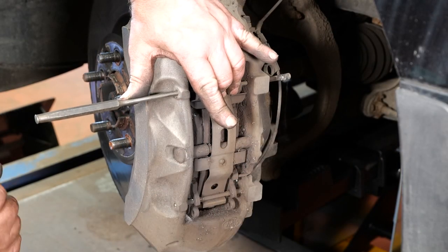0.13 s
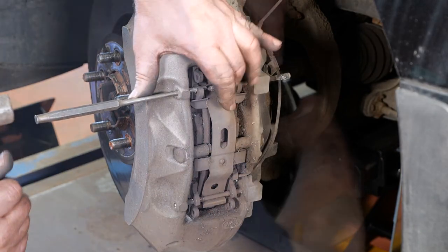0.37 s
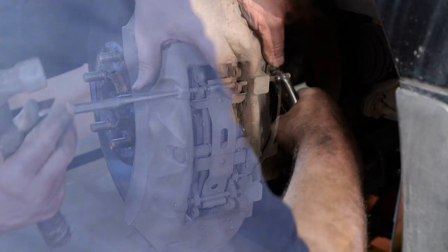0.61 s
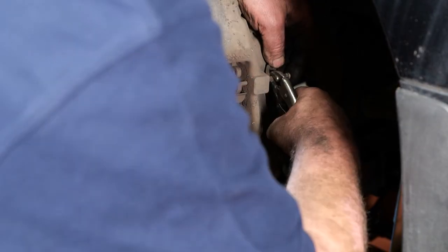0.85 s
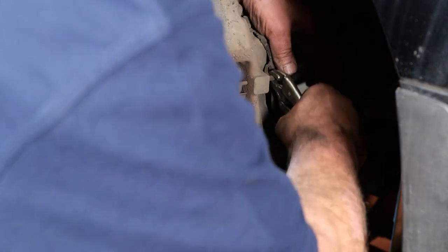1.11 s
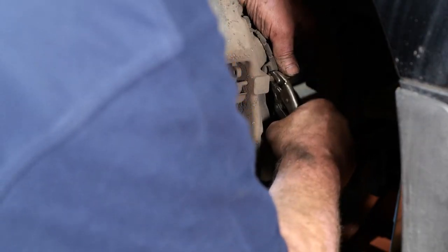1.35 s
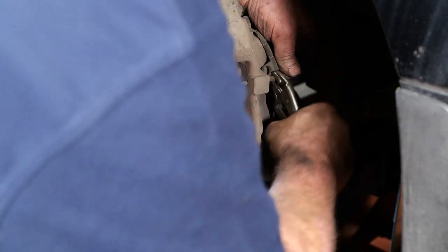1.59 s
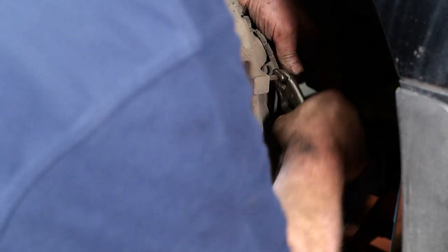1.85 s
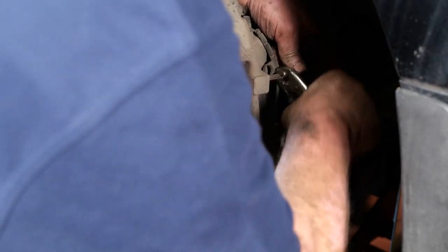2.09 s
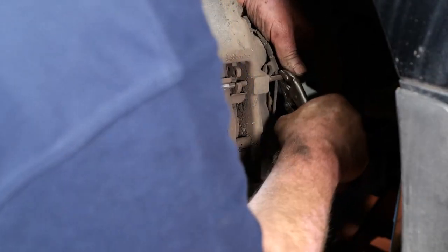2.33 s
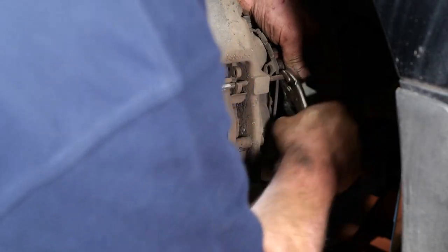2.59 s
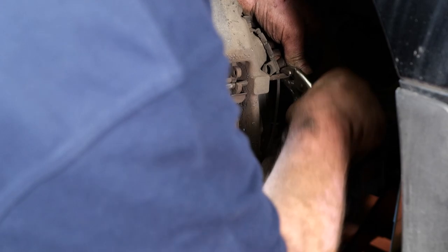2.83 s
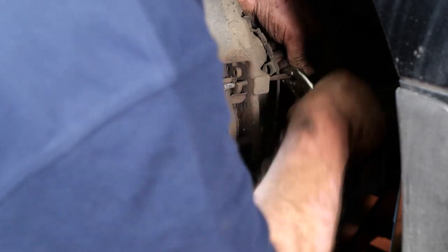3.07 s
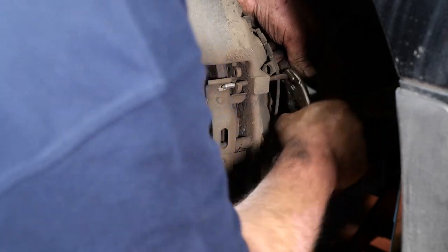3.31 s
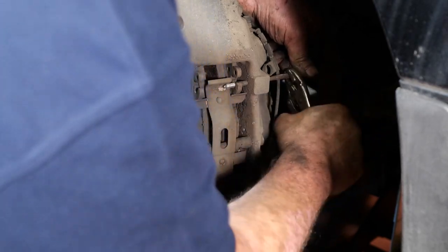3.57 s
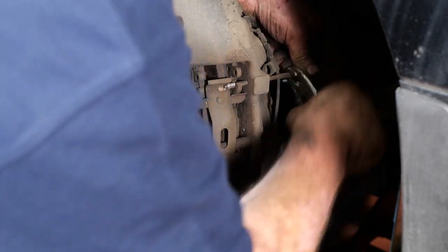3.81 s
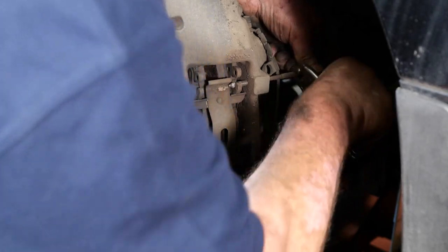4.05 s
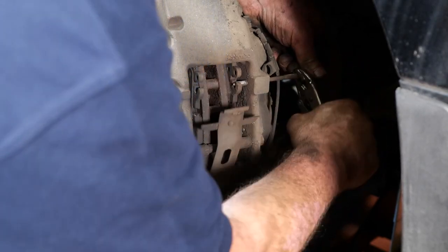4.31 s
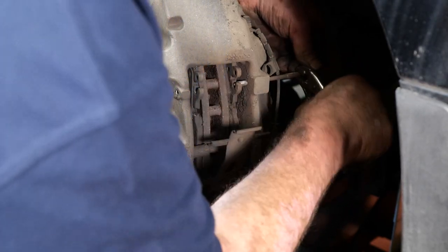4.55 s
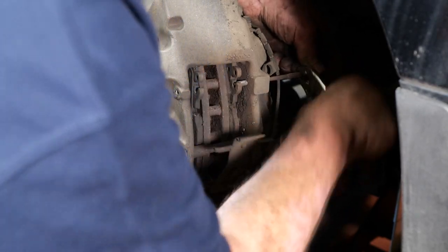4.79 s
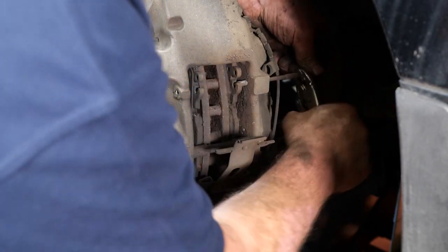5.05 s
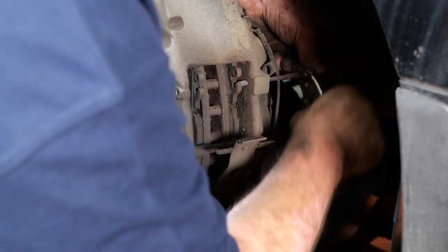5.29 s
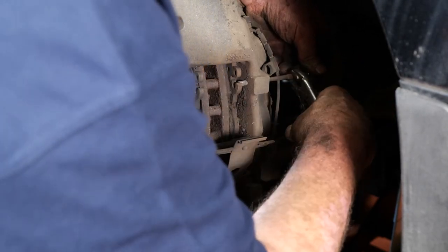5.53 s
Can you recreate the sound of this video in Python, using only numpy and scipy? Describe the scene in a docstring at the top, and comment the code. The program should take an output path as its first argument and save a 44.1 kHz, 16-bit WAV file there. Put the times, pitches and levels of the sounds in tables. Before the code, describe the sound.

Close up in a quiet workshop, the tail of one hammer blow leads into two loud, bright strikes on a steel punch, the heavy brake caliper ringing. The ring and echo are chopped off suddenly. Very quiet pliers work follows, with small ticks, dry rubs and faint squeaks, until a flat metal spring pops out with a sharp clack and a short rattle. Faint ticks and rubs continue over low rumble and soft hiss.

```python
"""Quiet workshop, close to a brake caliper: a hammer taps a steel punch, then its ring and echo break off abruptly.
Pliers twist the pin with ticks, rubs and squeaks until the pad spring jumps out and rattles down.
Impacts are noisy cracks plus decaying modes of the struck object; rubs and squeaks are filtered noise.
The room answers every sound; a low rumble, a far machine's hum and microphone hiss lie beneath.
"""
import sys
import numpy as np
from scipy import signal
from scipy.fft import rfft, irfft
from scipy.io import wavfile
from scipy.ndimage import uniform_filter1d

SR = 44100
rng = np.random.default_rng(int(sys.argv[2]) if len(sys.argv) > 2 else 0)


def amplitude_ratio(level_db):
    """Convert a level in decibels to the matching linear amplitude (field) ratio."""
    exponent = np.asarray(level_db, float) / 20
    return 10 ** exponent


def output_pcm(signal):
    """Save a mono or channel-first signal as 16-bit PCM at the path in sys.argv[1].

    Samples are clipped to [-1, 1] before scaling.
    """
    pcm = np.clip(np.atleast_2d(signal).T, -1, 1) * 32767
    wavfile.write(sys.argv[1], SR, np.round(pcm).astype(np.int16))


N = 249606

# Impacts of hammer, spring and pliers: start_s, level_db (before band colour and tilt),
# tilt_db_per_octave (hardness), crack_t60_s
BLOWS = [(-.097, -26.5, -0.29, 0.075), (0.1246, -21, 0.092, 0.049), (0.3448, -20, 0.57, 0.075)]
SPRING_HITS = [(4.1225, -47.5, -3, 0.074), (4.126, -46, -1, 0.094), (4.136, -53, -3.5, 0.091),
               (4.145, -55, 0, 0.026), (4.2745, -46.5, -1.5, 0.086), (4.2835, -18, 4, 0.037),
               (4.297, -28.5, 1.4, 0.089), (4.3025, -32, 3, 0.052), (4.343, -49, 1.7, 0.06),
               (4.409, -42, -0.4, 0.052), (4.4125, -43.5, -1, 0.087), (4.419, -61, -6, 0.074)]
TICKS = [(.7194, -71, 4, .015), (1.3513, -62.5, -0.5, 0.011), (1.3634, -65, .1, .02),
         (1.3894, -58.5, 0.5, 0.013), (1.4044, -60.5, 3.5, 0.018), (1.4202, -55.5, -1.5, 0.021),
         (1.6092, -58, -1.8, 0.041), (1.7264, -68, -2.1, 0.018), (1.7384, -48.5, 4, 0.025),
         (1.8924, -64, 6.2, 0.058), (1.9016, -51, -3, 0.025), (2.155, -64.5, -8, 0.029),
         (2.2955, -41.5, -3.5, 0.033), (2.2995, -62.5, -9, 0.017), (2.4744, -67, -1, 0.065),
         (3.6644, -66.5, -2, .026), (4.6814, -74, 1.5, 0.042), (4.7974, -58, -0.5, 0.017),
         (4.8074, -74, 8, .013), (4.8594, -68, -9, 0.05), (5.194, -70, -9, 0.035),
         (5.2974, -61.5, -0.5, 0.014), (5.4744, -66, 6, 0.037), (5.4919, -53, 4.5, .035),
         (5.6431, -58.5, 4.5, 0.044)]
# Edges of the four crack bands of each kind: edge_hz
BLOW_EDGES_HZ = (220, 1000, 3000, 8500, 15000)
SPRING_EDGES_HZ = (220, 1100, 3000, 8500, 15000)
TICK_EDGES_HZ = (600, 2400, 4900, 9000, 15000)
# Tone colour of each kind, one offset per band: level_db
BLOW_COLOUR_DB = (-6, -5, -1.5, -4.5)
SPRING_COLOUR_DB = (-6, 0.5, -2, -5.5)
TICK_COLOUR_DB = (-8, -1, -1, -4)
# Ringing modes of the caliper, the plate the spring strikes and the pliers: pitch_hz, level_db, t60_s
CALIPER_MODES = [(60, -3, .45), (105, -7, .35), (150, -7, .3), (210, -8, .25), (255, -5, .3), (307, 1, .43),
                 (345, -6, .4), (391, 0, .5), (430, -3, .3), (517, -3, .55), (580, -7, .3), (656, -1, .13),
                 (760, -5, .12), (851, -15, .6), (1093, 1, .38), (1217, -12, .5), (1560, -6, .08),
                 (1730, -3, .2), (1850, -4, .1), (2240, -5, .16), (2805, -10, .2), (3898, -7, .13),
                 (4247, -14, .2), (4592, -12, .14), (4990, -7, .11), (5572, -9, .15), (6610, -11, .2),
                 (7100, -7, .13), (7784, -13, .15), (8258, -11, .12), (11130, -17, .15), (11900, -12, .08)]
PLATE_MODES = [(45, -5.5, 0.41), (130, -17.5, 0.19), (267.6, -6.5, .12), (523, -18, .12), (731, 0, 0.2),
               (1280, -3, 0.09), (1660, -4.5, 0.18), (1804, -5, 0.22), (1906, -19, .15), (2244, -8, 0.13),
               (2960, -24, .11), (3860, -22.5, .15), (4096, -8, 0.19), (4235, -18.5, 0.37),
               (4500, -7, 0.14), (5200, -6.5, 0.063), (6200, -5, 0.086), (6600, -6.5, 0.078),
               (6960, -6, .1), (7150, -4.5, 0.11), (7820, -5, .12), (8340, -9.5, .15), (11900, -14.5, 0.11),
               (13400, -12, .1)]
PLIERS_MODES = [(1144, 8, 0.086), (1496, 11, 0.096), (1730, 7, 0.15), (2280, 0.5, 0.11), (2860, -7, 0.11),
                (3690, -5.5, 0.051), (4160, -20, 0.048), (5690, -0.5, 0.03), (7270, 1.5, 0.023),
                (10300, -9, 0.046), (11350, -5, 0.02)]
# The pin turning in its bore, a hand brushing past: middle_s, half_length_s,
# level_db (before band colour, tilt and swell), tilt_db_per_octave
RUBS = [(1.205, 0.11, -79.5, 10.5), (1.67, 0.062, -79, 0), (1.84, .04, -78, 1), (2.0, .026, -71.5, -1),
        (2.135, 0.042, -77.5, 2.5), (2.288, 0.023, -61.5, 0.5), (2.391, 0.024, -76.5, 3.5),
        (2.6, 0.06, -78, 1.5), (2.71, 0.04, -76.5, -0.5), (2.856, 0.062, -73, -0.2),
        (3.018, 0.037, -71, -3), (3.174, .033, -70, -0.5), (3.338, 0.033, -70.5, -2),
        (3.47, 0.034, -72.5, -0.5), (3.645, 0.039, -73.5, 3.3), (3.778, 0.022, -74, 1.2),
        (3.966, 0.051, -75, 0.8), (4.759, .035, -66, -2.3), (4.868, 0.029, -75.5, -3),
        (5.194, .025, -83, -3.5), (5.26, 0.026, -79, -3.7), (5.599, .025, -84.5, 4.5)]
# Edges of the three rub bands: edge_hz
RUB_EDGES_HZ = (1000, 3300, 8500, 14000)
# Tone colour of the rubs, one offset per band: level_db
RUB_COLOUR_DB = (-1.5, -3, -11)
# Resonances of the rubbed pin: pitch_hz, level_db
BORE_MODES = [(1200, 0), (2400, -6), (4900, -8), (6000, -4.5), (7500, -10.5), (11500, -7)]
# Brief squeaks of the pin slipping: start_s, pitch_hz, level_db (rms before the swell), half_length_s
SQUEAKS = [(1.925, 1117, -66, .045), (2.151, 1800, -70, 0.029), (2.225, 1760, -68.5, 0.049),
           (3.51, 3040, -66, 0.016), (4.861, 800, -61.5, 0.0316), (5.189, 1268, -62.5, .025),
           (5.25, 2290, -67, 0.025)]
# The workshop's answer to a click: band_centre_hz, level_db (energy), t60_s
ROOM_BANDS = [(162, -18.5, 0.23), (267, -24, 0.24), (560, -35, 0.45), (1210, -31.5, 0.95),
              (1852, -28.5, 0.53), (3370, -27.5, 0.57), (5100, -24.5, 0.34), (7000, -28.5, 0.74),
              (10500, -27.5, 0.47), (13444, -31.5, 0.38)]
# Spectrum of the building's rumble: pitch_hz, level_db_per_hz (relative)
AIR_SPECTRUM = [(13, -23), (24, 5.5), (34, -1.5), (97, -6.5), (243, -13.5), (429, -11), (548, -20.5),
                (627, -20.5), (867, -23.5), (940, -25), (1230, -22), (2000, -24.5), (2770, -33.5),
                (5740, -43), (12200, -53), (14000, -54.5)]
# Tones of the far machine: pitch_hz, level_db (rms)
HUM_TONES = [(274.5, -87.5), (339.1, -79.5), (366.1, -83), (409.1, -81.5), (430.7, -77.5), (500.6, -86),
             (613.7, -85.5)]

CUT_S = .551  # the hammer's sound is gone from here on
LEAD = SR // 5  # samples of sound before the start
AIR_DB, AIR_SIDE_DB = -65.5, -22  # rms; stereo side against the middle
HUM_WIDTH_HZ = 7.3
SIDE_DB, ROOM_SIDE_DB = -24.5, -21.5  # side level of the early scatter (before its treble tilt), of the echo
DAMPED_WIDTH, BETWEEN_MODES_DB = 0.028, -7  # hump half-width as a share of the pitch; floor between humps
RISE_S, CRACK_GRAIN_DB = .0002, 2.2  # time constant of the crack's onset; unevenness of its grains
PIVOT_HZ = 4000  # tilt turns about this pitch
FAINT_DB, FAINT_SPREAD_DB, FAINT_TILT_DB, FAINT_T60_S = -72.5, 5, 0, .025  # stray faint ticks
SQUEAK_WIDTH = 0.091  # share of the pitch, to either side
THUMP_DB, THUMP_S = -12, 0.0016  # peak against the blow's level; contact time
OVERLOAD, ROLL_OFF_HZ = 0.44, 12800  # amplitude limit of the microphones; start of their treble loss
HISS_DB, HISS_LOW_HZ, HISS_TOP_HZ = -81.5, 1505, 12900
TOP_HZ = 16300


def band(x, low_hz, high_hz):
    """Steep band-pass."""
    sos = signal.butter(3, [low_hz, min(high_hz, .45 * SR)], "band", fs=SR, output="sos")
    return signal.sosfilt(sos, x)


def below(x, top_hz):
    """Brick-wall low-pass."""
    return signal.sosfilt(signal.ellip(8, .2, 60, top_hz, fs=SR, output="sos"), x)


def unit(x):
    """Scale to rms 1."""
    return x / np.sqrt(np.mean(x ** 2))


def fade(t60, size):
    """Exponential decay, 60 dB in t60 (3 ms at the least)."""
    return np.exp(-np.log(1000) * np.arange(size) / SR / max(t60, .003))


def add(track, s, sound):
    """Mix a sound in at time s."""
    i = int(s * SR) + LEAD
    track[i:i + len(sound)] += sound[:len(track) - i]


def split(x, edges_hz):
    """Neighbouring bands, each at rms 1."""
    return [unit(band(x, low, high)) for low, high in zip(edges_hz, edges_hz[1:])]


def band_centres(edges_hz):
    """Geometric middle of each band, in Hz."""
    return np.sqrt(np.multiply(edges_hz[1:], edges_hz[:-1]))


def colour(edges_hz, colour_db, db, tilt_db):
    """Level of each band: harder contacts tilt towards the treble, softer ones towards the bass."""
    octaves = np.log2(band_centres(edges_hz) / PIVOT_HZ)
    return db + np.array(colour_db) + tilt_db * octaves


def grit(grain_db, size):
    """Noise of tiny contacts, a few much bigger than the rest."""
    return rng.standard_normal(size) * amplitude_ratio(grain_db * rng.exponential(size=size))


def humps(x, hz, mode_db, width):
    """While parts touch, the modes are damped into broad humps that colour the noise of the contact."""
    f = np.fft.rfftfreq(len(x), 1 / SR)
    resonances = amplitude_ratio(mode_db) / (1 + ((f - hz) / (width * hz)) ** 2)
    shape = amplitude_ratio(BETWEEN_MODES_DB) + np.sum(resonances, axis=0)
    return irfft(shape * rfft(x), len(x))


def rumble():
    """Broadband noise of the building, shaped by its spectrum."""
    f = np.maximum(np.fft.rfftfreq(N, 1 / SR), 1)
    hz, db = np.transpose(AIR_SPECTRUM)
    shape = amplitude_ratio(np.interp(np.log(f), np.log(hz), db))
    return amplitude_ratio(AIR_DB) * unit(irfft(shape * rfft(rng.standard_normal(N)), N))


def machine_hum():
    """Far machine: narrow noise bands, heard as wavering tones."""
    hum = np.zeros(N)
    for hz, db in HUM_TONES:
        tone = band(rng.standard_normal(N), hz - HUM_WIDTH_HZ / 2, hz + HUM_WIDTH_HZ / 2)
        hum += amplitude_ratio(db) * unit(tone)
    return hum


def workshop():
    """Rumble and far hum, nearly alike in both ears; a weak unrelated rumble widens them."""
    mid = below(rumble() + machine_hum(), HISS_TOP_HZ)
    return mid + amplitude_ratio(AIR_SIDE_DB) * rumble() * np.array([[1], [-1]])


def room(dry):
    """Diffuse echo, each band dying at its own rate; the side gets a weak unrelated echo and early scatter."""
    echo = np.zeros((2, SR))
    for hz, db, t60 in ROOM_BANDS:
        tail = band(rng.standard_normal((2, SR)), hz / 1.4, hz * 1.3) * fade(t60, size=SR)
        echo += amplitude_ratio(db) * unit(tail) / np.sqrt(SR)
    mid, side = signal.fftconvolve(dry[None], echo, axes=1)[:, :len(dry)]
    scatter = unit(rng.standard_normal(1600) * fade(.03, size=1600)) / 40  # energy 1
    # the early scatter at the sides is tilted towards the treble
    scatter = signal.lfilter([1, -.45], 1, scatter)
    early = signal.fftconvolve(dry, scatter)[:len(dry)]
    side = amplitude_ratio(ROOM_SIDE_DB) * side + amplitude_ratio(SIDE_DB) * early
    return np.array([dry + mid + side, dry + mid - side])[:, LEAD:]


def rubs():
    """Dense grit through the pin's resonances, swelling and dying with each turn of the wrist."""
    track = np.zeros(N + LEAD)
    hz, mode_db = np.transpose(BORE_MODES)[:, :, None]
    layers = split(humps(grit(grain_db=2.5, size=N), hz, mode_db, width=0.094), RUB_EDGES_HZ)
    for middle_s, half_s, db, tilt_db in RUBS:
        levels_db = colour(RUB_EDGES_HZ, RUB_COLOUR_DB, db, tilt_db)
        start, size = int((middle_s - half_s) * SR), int(2 * half_s * SR)
        sound = sum(amplitude_ratio(level) * layer[start:start + size] for level, layer in zip(levels_db, layers))
        add(track, middle_s - half_s, sound * np.hanning(size) ** 0.5)
    return track


def squeaks():
    """Slip noise caught by one narrow resonance, quick to start, slow to die."""
    track = np.zeros(N + LEAD)
    for s, hz, db, half_s in SQUEAKS:
        u = np.arange(int(2 * half_s * SR)) / (half_s * SR)  # runs from 0 to 2
        noise = band(rng.standard_normal(SR // 5), hz * (1 - SQUEAK_WIDTH), hz * (1 + SQUEAK_WIDTH))
        swell = np.sqrt(u) * np.exp(-3 * u) * 3
        add(track, s, amplitude_ratio(db) * unit(noise[-len(u):]) * swell)  # the end of the noise, filter settled
    return track


def strike(events, edges_hz, colour_db, modes, ring_db, detune, rattle_db, bloom_s, size):
    """Each impact is a rattling crack in four bands; its colour sets how hard each mode of the object rings."""
    track = np.zeros(N + LEAD)
    hz, mode_db, t60 = np.transpose(modes)[:, :, None]
    t = np.arange(size) / SR
    log_centres = np.log(band_centres(edges_hz))
    dying = np.array([fade(d, size) for d in t60[:, 0]])
    # the blow takes a moment to spread through the whole object
    bloom = 1 - np.exp(-t / max(bloom_s, 1e-4))
    for s, db, tilt_db, crack_t60 in events:
        levels_db = colour(edges_hz, colour_db, db, tilt_db)
        contact = (1 - np.exp(-t / RISE_S)) * fade(crack_t60, size)
        layers = split(humps(grit(CRACK_GRAIN_DB, size), hz, mode_db, DAMPED_WIDTH), edges_hz)
        crack = sum(amplitude_ratio(level) * layer for level, layer in zip(levels_db, layers))
        strength, shift, phase = rng.standard_normal((3, len(hz), 1))
        # loose neighbours touch and let go, so each mode swells and chokes as it dies
        steps = np.repeat(rng.standard_normal((len(hz), size // 500)), 500, axis=1)
        loose = uniform_filter1d(steps, size=500)
        drive_db = np.interp(np.log(hz), log_centres, levels_db)
        gain = amplitude_ratio(ring_db + mode_db + drive_db + 1.3 * strength + rattle_db * loose)
        tones = np.sin(2 * np.pi * (hz * (1 + detune * shift) * t + phase))
        ring = np.sum(gain * dying * tones, axis=0)
        add(track, s, crack * contact + ring * bloom)
    return track


def faint_ticks(count):
    """A few barely heard ticks at random moments after the hammer has broken off."""
    when = rng.uniform(CUT_S, N / SR, count)
    chance = rng.standard_normal((count, 2))
    return [(s, FAINT_DB + FAINT_SPREAD_DB * a, FAINT_TILT_DB * b, FAINT_T60_S)
            for s, (a, b) in zip(when, chance)]


def pliers():
    """Small steel ticks, with short rings of the pliers' own modes."""
    return strike(TICKS + faint_ticks(count=6), TICK_EDGES_HZ, TICK_COLOUR_DB, PLIERS_MODES, ring_db=-20.5,
                  detune=0.03, rattle_db=5, bloom_s=0.00061, size=7000)


def spring():
    """The pad spring jumps out and rattles down, ringing plate modes that chatter strongly."""
    return strike(SPRING_HITS, SPRING_EDGES_HZ, SPRING_COLOUR_DB, PLATE_MODES, ring_db=-17.5,
                  detune=0.0103, rattle_db=9.5, bloom_s=0.00047, size=14000)


def thumps():
    """Each blow shoves the whole hub once: a short rounded push."""
    track = np.zeros(N + LEAD)
    for s, db, *_ in BLOWS:
        add(track, s, amplitude_ratio(db + THUMP_DB) * np.hanning(int(THUMP_S * SR)))
    return track


def hammer():
    """Blows on the punch: cracks that set the heavy caliper ringing, each with its push."""
    ringing = strike(BLOWS, BLOW_EDGES_HZ, BLOW_COLOUR_DB, CALIPER_MODES, ring_db=-19.0,
                     detune=0.0015, rattle_db=4, bloom_s=.005, size=30000)
    return ringing + thumps()


def scene():
    """Hammer first, its ring and echo chopped off; then the pliers and spring, all over the workshop air."""
    before_cut = np.clip((CUT_S - np.arange(N) / SR) / 0.00284, 0, 1)  # 2.84 ms ramp down
    plier_work = spring() + pliers() + rubs() + squeaks()
    return room(hammer()) * before_cut + room(plier_work) + workshop()


def top_cut(x):
    """Nothing passes above the cut-off."""
    return signal.sosfilt(signal.butter(12, 16410, fs=SR, output="sos"), x)


def record(dry):
    """The microphones round the loudest peaks, dull the top treble and each adds its own thin hiss."""
    rounded = OVERLOAD * np.tanh(dry / OVERLOAD)
    dulled = signal.sosfilt(signal.butter(6, ROLL_OFF_HZ, fs=SR, output="sos"), rounded)
    noise = band(rng.standard_normal(dry.shape), HISS_LOW_HZ, SR / 2)
    hiss = amplitude_ratio(HISS_DB) * unit(below(noise, HISS_TOP_HZ))
    mix = below(dulled + hiss, TOP_HZ)
    return top_cut(mix)


dry = scene()
out = record(dry)
output_pcm(out)
```